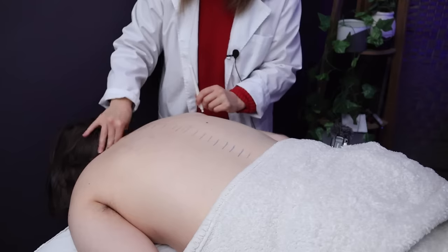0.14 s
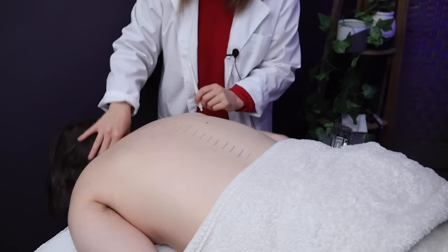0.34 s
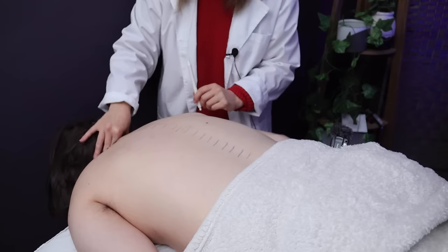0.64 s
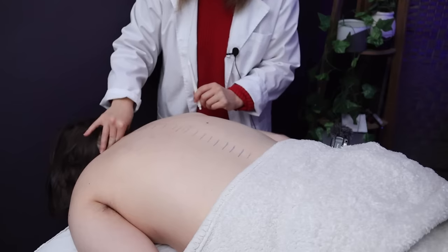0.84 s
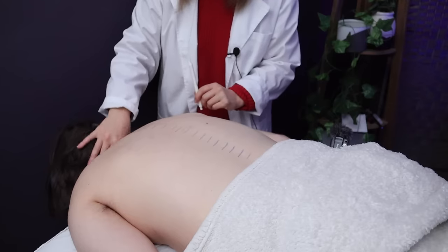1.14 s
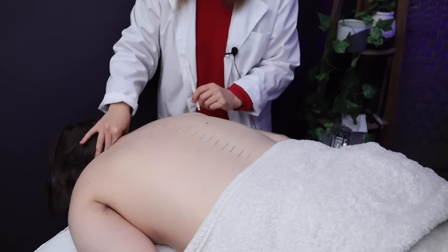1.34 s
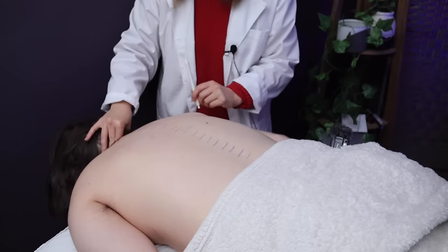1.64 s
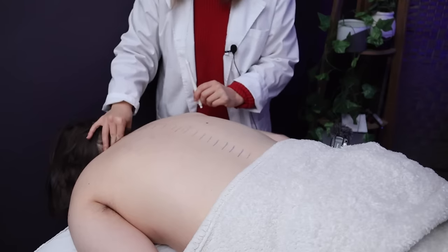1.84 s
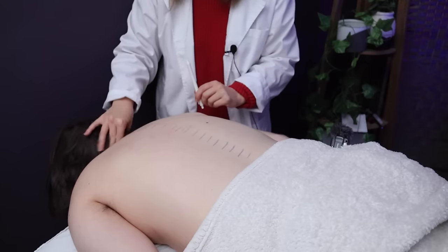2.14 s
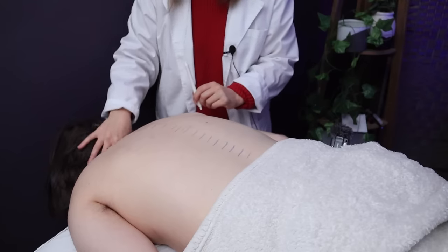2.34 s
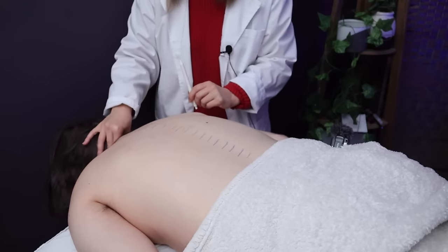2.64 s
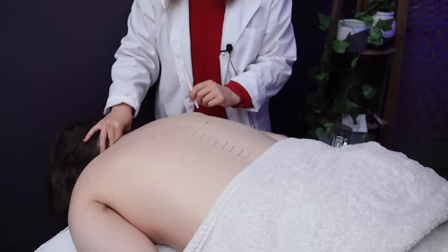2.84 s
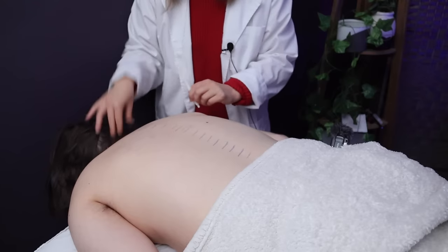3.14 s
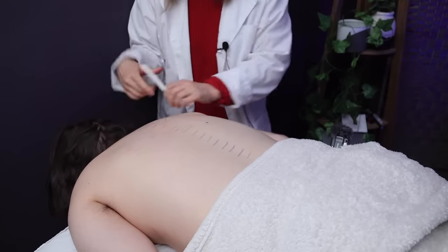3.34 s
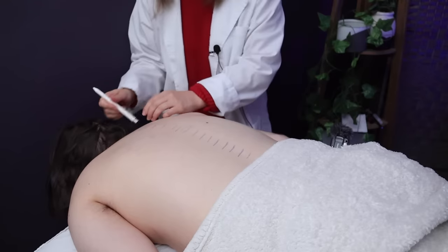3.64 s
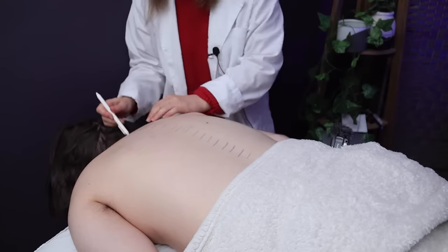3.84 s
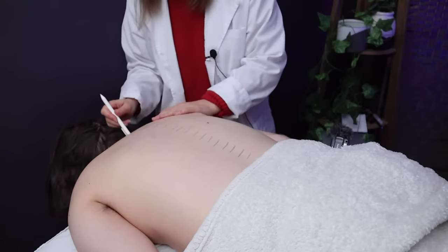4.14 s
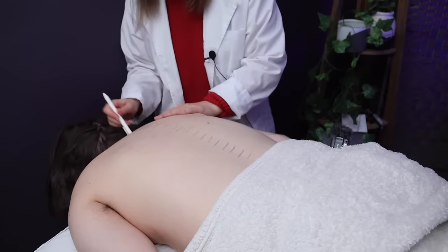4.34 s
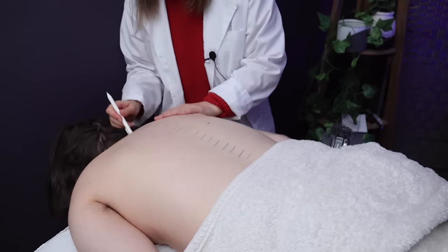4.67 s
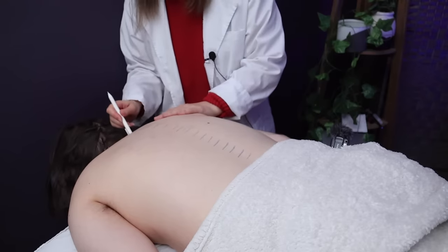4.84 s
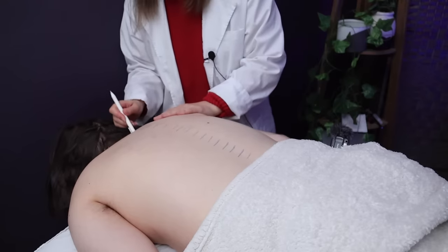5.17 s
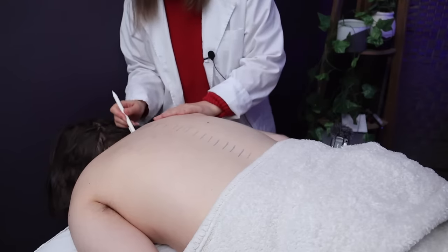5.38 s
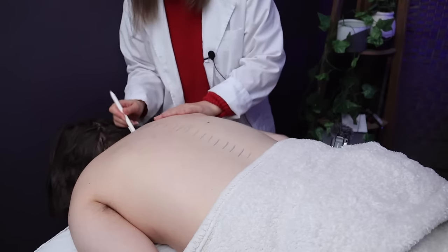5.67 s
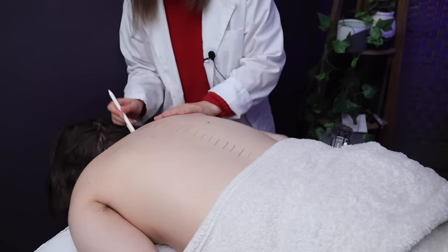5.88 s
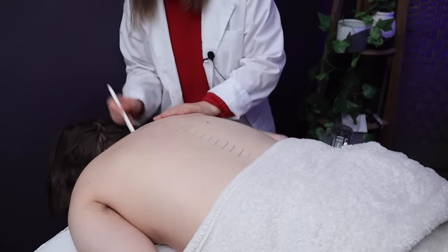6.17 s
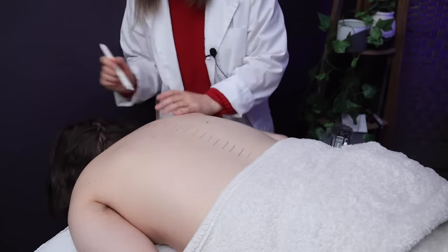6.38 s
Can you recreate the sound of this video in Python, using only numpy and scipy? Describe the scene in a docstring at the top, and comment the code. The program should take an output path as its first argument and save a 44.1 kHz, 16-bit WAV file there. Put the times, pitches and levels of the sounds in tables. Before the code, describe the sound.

A close lapel microphone in a quiet room with a faint low hush. From 0 to about 3.1 seconds, fingertips stroke through hair: short, soft, airy hisses, then a longer stroke from 1.4 to 2.3 with tiny crackling strand flicks near 2.1 and 3.0. A coat rustles low underneath; a dull soft bump falls at 0.64. From 3.1 to 3.8 the sleeve swishes more strongly, a thin slide at 3.36 draws the pen out, a low bump and cuff puff follow, and a tick sounds at 3.63. Another swish leads to a firmer tap at 4.16. From 4.31 to 6.38, twelve loud, bright, snappy presses each get a quieter, duller release about 0.07 seconds later, spaced unevenly at first, then roughly every 0.15 seconds. The last pair is almost merged. Faint handling ticks, short close reflections and a final light sleeve rustle around 6.5.

```python
"""In a quiet room, close to a lapel microphone, fingertips stroke through hair and a coat sleeve swishes.
The hand takes a plastic pen and clicks it against a person's neck: bright presses, duller releases.
Friction is noise of uneven grain, shaped by a spectrum and by the speed or pressure of the contact.
Impacts are short decaying noise bursts, coloured by the struck body; nearby surfaces echo the pen
within about 20 ms, and a faint diffuse tail follows."""
import sys
import numpy as np
from scipy import signal
from scipy.fft import rfft, irfft, next_fast_len
from scipy.io import wavfile
from scipy.ndimage import map_coordinates

SR = 44100
rng = np.random.default_rng(int(sys.argv[2]) if len(sys.argv) > 2 else 0)


def output_pcm(signal):
    """Save a mono or channel-first signal as 16-bit PCM at the path in sys.argv[1].

    Samples are clipped to [-1, 1] before scaling.
    """
    pcm = np.clip(np.atleast_2d(signal).T, -1, 1) * 32767
    wavfile.write(sys.argv[1], SR, np.round(pcm).astype(np.int16))


N = 287091  # length in samples

# All event levels of short sounds refer to the energy of this span.
REFERENCE_S = 0.005

# Spectrum of the room's hush: frequency_hz, relative_density_db [dB per Hz]
HUSH_SPECTRUM = [(12, -31), (20, 0), (91, -3), (193, -1.5), (301, -5.5), (499, -10), (574, -10), (642, -11),
                 (1370, -16), (2140, -18.5), (3740, -20.5), (4180, -22.5), (4940, -21.5), (16000, -27)]
# Reverberation time of the room: frequency_hz, t60_s
ROOM_T60 = [(200, 0.3), (2000, 0.47), (5000, 0.37), (10000, 0.36), (16000, 0.047)]
# Reflections from nearby surfaces: delay_s, level_db
ECHOES = [(.0070, -17.5), (.0093, -18), (0.012, -25.5), (0.0174, -34), (.0202, -27.5)]
# Colour of a snap as radiated into the room: frequency_hz, gain_db
RADIATED_COLOUR = [(200, -11.5), (600, -6.5), (1700, -13.5), (2600, -7), (4300, -1), (6000, -2.5),
                   (8000, -1.5), (9800, -2.5), (12500, -1.5), (14000, -10.5), (16000, -21)]

# Spectrum of the coat stirred by the arm: frequency_hz, relative_density_db [dB per Hz]
STIR_SPECTRUM = [(40, 1), (130, -1), (260, -1.5), (450, -10), (900, -8.5), (1600, -14), (4000, -23)]
# Spectrum of flapping cotton folds: frequency_hz, relative_density_db [dB per Hz]
FOLD_SPECTRUM = [(30, -33), (70, -2), (130, 1), (260, 0.5), (450, -2.5), (1000, -5), (2300, -9),
                 (4000, -17.5), (9000, -41)]
# Spectrum of the rasping weave: frequency_hz, relative_density_db [dB per Hz]
WEAVE_SPECTRUM = [(1000, -26), (2500, -1.5), (4000, -1.5), (5200, 0), (8200, -1), (10500, 1.5), (12000, -3),
                  (14000, -8.5), (16000, -23)]
# Moves of the arm: the fingers set off, a long stroke begins, the hand lifts off the head, fetches
# the pen, swings back, brings the pen to the neck, works the button and lifts away:
# fastest_s, speeding_up_s, slowing_down_s, flapping_db, sliding_db
ARM_MOVES = [(.12, 0.057, 0.034, -51.5, -73), (1.47, 0.098, 0.046, -58, -64),
             (3.264, .17, 0.18, -50.5, -45.5), (3.592, .4, 0.2, -41.5, -41), (3.779, 0.064, 0.49, -54, -59),
             (4.209, 0.48, 0.44, -48, -48.5), (5.8, 0.91, 0.56, -67.5, -79),
             (6.49, 0.31, 0.22, -54.5, -60.5)]
FLAP_POWER, SLIDE_POWER = 1.28, 1.57  # gain as a power of the arm's relative speed
FLOP_S = 3.61  # the loose cuff flops as the hands meet

# Spectrum of strands under the fingertips: frequency_hz, relative_density_db [dB per Hz]
STRAND_SPECTRUM = [(900, -37), (1600, -6), (2600, -7), (3300, 0), (4100, 1.5), (4900, -1.5), (6100, 0.5),
                   (8000, 0.5), (10700, -1.5), (12500, -6), (14000, -8), (16000, -27)]
# Strokes of the fingertips through the hair: start_s, length_s, level_db, flick_rate_per_s
HAIR_STROKES = [(0.046, 0.36, -53, 10), (0.434, .18, -50.5, 5), (0.712, .38, -53, 10),
                (1.088, 0.19, -54, 5), (1.356, 0.96, -58, 40), (2.315, 0.2, -54.5, 5),
                (2.422, 0.46, -64.5, 20), (2.85, 0.47, -59, 60)]
STROKE_ATTACK_S, STROKE_RELEASE_S = 0.069, 0.089  # the fingers speed up and lift
BEAR_DOWN_DB, BEAR_DOWN_S = 3.5, 0.25  # rise to full pressure and the time it takes
IN_HAIR_S = 3.12  # the hand leaves the hair at this time
# The loudest strands that flick free: start_s, level_db [over 5 ms]
LOUD_FLICKS = [(2.0806, -52), (2.148, -55), (2.186, -53.5), (2.2114, -49.5), (2.7645, -56), (2.947, -54),
               (3.022, -56), (3.0414, -53)]
# Colour of a flicking strand: frequency_hz, gain_db
FLICK_COLOUR = [(2000, -35), (6000, 2), (10000, 3), (13000, -2), (16000, -20)]
# Smooth slides: hair slips from under the fingers, then the barrel is drawn out of the other hand:
# fastest_s, speeding_up_s, slowing_down_s, level_db, centre_hz
SMOOTH_SLIDES = [(3.15, 0.56, 0.22, -66, 4100), (3.36, 0.1, 0.098, -47.5, 10000)]

# Soft bumps of the hand: start_s, level_db [peak before onset and decay], pitch_hz
HAND_BUMPS = [(.108, -46, 190), (0.644, -30.5, 119), (1.376, -41, 140), (3.457, -33, 80)]
# Ticks of the pen as it is gripped, set on the skin and shifted between clicks:
# start_s, level_db [over 5 ms], brightness_db_per_octave
PEN_TICKS = [(3.295, -54, -20), (3.6272, -33, -3.5), (4.164, -27.5, -1.5), (4.2067, -37.5, 6.5),
             (4.5441, -38, 1), (5.287, -41.5, -0.5), (5.3161, -47, 3), (5.527, -43, 1), (5.837, -50, 1),
             (6.3531, -46.5, -7)]
# Colour of a plastic snap: frequency_hz, gain_db
SNAP_COLOUR = [(300, -25.5), (1000, -13), (1700, -5), (2100, 1), (2700, 2), (3400, 1), (4600, 5.5),
               (6000, 3.5), (8500, 1.5), (9600, 6), (11000, 1), (12700, 0.5), (13800, -7), (16000, -10)]
# Colour of the pen's damped knock in the hand: frequency_hz, gain_db
KNOCK_COLOUR = [(60, -25.5), (140, -8), (260, -0.5), (560, 2.5), (900, -3), (1300, 0.5), (2200, -10.5),
                (4000, -40)]
SPRING_HZ, SPRING_WIDTH_HZ, SPRING_T60 = 4000, 450, 0.3  # faint after-ring; T60 in s
# Presses; the grip shifts the barrel's resonances and passes on more or less of the jolt:
# start_s, level_db [over 5 ms], brightness_db_per_octave, lower_hz, upper_hz, knock_db
PRESSES = [(4.3135, -18, 5, 3260, 8500, -45), (4.494, -17, 6.5, 2900, 11900, -35),
           (4.7836, -16, 5, 5770, 7700, -40.5), (4.9417, -19.5, 1.5, 2470, 10250, -39),
           (5.255, -20.5, 1, 6640, 11800, -47), (5.4764, -18.7, 4.5, 2900, 9300, -37),
           (5.6374, -19.5, 2.5, 2430, 11200, -50), (5.7907, -18, 3, 2850, 13100, -39),
           (5.9371, -18.5, 2, 6600, 8160, -42), (6.0792, -17.5, 4, 5170, 9700, -41.5),
           (6.2379, -18.5, 5, 5250, 7900, -44.5), (6.3689, -19, 0.5, 4020, 7200, -43)]
# Duller releases: start_s, level_db [over 5 ms], lower_hz, upper_hz
RELEASES = [(4.376, -31.5, 2720, 12400), (4.5557, -23, 4800, 9800), (4.8625, -29, 4080, 9800),
            (5.0231, -31, 6240, 10300), (5.346, -25, 4400, 10800), (5.545, -21.5, 3600, 6800),
            (5.7064, -30, 6300, 9100), (5.8612, -28.5, 2420, 10600), (6.0089, -25.5, 3740, 10400),
            (6.1506, -25.5, 4060, 7800), (6.2804, -25.5, 4960, 10000), (6.3776, -25.5, 2500, 10500)]
RELEASE_BRIGHT = -1.03  # dB per octave, the same for every release
# The button takes up its slack before each press: lead in s, level in dB, dB per octave
SLACK_S, SLACK_DB, SLACK_BRIGHT = 0.027, -59, -5.5
TOP_HZ = 16100  # band limit of the recorder


def amp(db):
    """Logarithmic level: decibels become an amplitude gain."""
    return 10 ** (np.asarray(db) / 20)


def unit(x):
    """Mean power: scale to rms 1."""
    return x / np.sqrt(np.mean(x ** 2) + 1e-20)


def burst(x):
    """Impulse energy: scale a short sound to the energy of 5 ms at rms 1."""
    return x * np.sqrt(REFERENCE_S * SR / (np.sum(x ** 2) + 1e-20))


def along(points, hz):
    """Spectral envelope: interpolate (Hz, value) points on a log-frequency axis."""
    point_hz, values = np.transpose(points)
    return np.interp(np.log(hz + 1), np.log(point_hz + 1), values)


def tilt(bright, hz):
    """Contact stiffness: harder contacts lift the treble, in dB per octave from 2 to 14 kHz."""
    return bright * np.log2(np.clip(hz, 2000, 14000))


def wobble(rate):
    """Slow fluctuation: a smooth random curve with rate knots a second."""
    knots = rng.standard_normal(int(N * rate / SR) + 4)
    return map_coordinates(knots, [np.arange(N) * rate / SR])


def filtered(x, response):
    """Linear filtering: multiply the spectrum of x by a response of frequency."""
    m = next_fast_len(N + SR // 2)
    return irfft(rfft(x, m) * response(np.fft.rfftfreq(m, 1 / SR)), m)[:N]


def coloured(x, gain_db, size=2048):
    """Causality: colour a short sound with a minimum-phase response, by folding its cepstrum."""
    log_gain = np.log(amp(gain_db(np.fft.rfftfreq(size, 1 / SR))))
    cepstrum = irfft(log_gain)
    cepstrum[1:size // 2] *= 2
    cepstrum[size // 2 + 1:] = 0
    return irfft(rfft(x, size) * np.exp(rfft(cepstrum)))


def add(track, s, sound):
    """Superposition: mix a sound into the track at time s."""
    part = track[max(0, round(s * SR)):][:len(sound)]
    part += sound[:len(part)]


def friction(spectrum, grain_db):
    """Granular noise: countless tiny slips of uneven size, with the given spectrum, at rms 1."""
    size_db = grain_db * np.minimum(rng.exponential(size=N), 7)
    slips = rng.standard_normal(N) * amp(size_db)
    return unit(filtered(slips, lambda hz: amp(along(spectrum, hz))))


def band(centre_hz, octaves):
    """Band-limited noise at rms 1, halved in amplitude at the given octaves from its centre."""
    def response(hz):
        return 1 / (1 + (np.log2((hz + 1) / centre_hz) / octaves) ** 4)
    return unit(filtered(rng.standard_normal(N), response))


def speed(s, rise, fall):
    """Uniform acceleration: a hand speeds up evenly until time s, then slows evenly to rest, 0-1."""
    return np.interp(np.arange(N) / SR, [s - rise, s, s + fall], [0, 1, 0])


def held(start, length):
    """Contact envelope: attack, hold and release of a finger's contact, 0-1."""
    t = np.arange(N) / SR - start
    return np.clip(np.minimum(t / STROKE_ATTACK_S, (length - t) / STROKE_RELEASE_S), 0, 1)


def in_hair():
    """Resting contact: 1 while the hand lies in the hair, 0 once it has lifted."""
    return held(-STROKE_ATTACK_S, IN_HAIR_S + STROKE_ATTACK_S)


def hush():
    """Stationary background noise: the room's steady hush, strongest in the bass."""
    return amp(-59.0) * friction(HUSH_SPECTRUM, grain_db=0.5)


def room(bright, tail_db=-23, scatter_db=-24, scatter_t60=0.14, gap=0.0044, echo_t60=0.011):
    """Reflection and decay: near echoes, scatter off the furniture and a faint tail answer a snap."""
    hz, frames, z = signal.stft(rng.standard_normal(SR // 3), SR, nperseg=256)
    decay = amp(-60 * frames / along(ROOM_T60, hz)[:, None])
    tail = signal.istft(z * decay, SR, nperseg=256)[1]
    t = np.arange(len(tail)) / SR

    def dying(t60):
        return burst(rng.standard_normal(len(t)) * amp(-60 * t / t60))

    answer = np.zeros(len(t))
    add(answer, gap, amp(tail_db) * burst(tail) + amp(scatter_db) * dying(scatter_t60))
    for delay, db in ECHOES:
        add(answer, delay, amp(db) * dying(echo_t60))
    # the pen radiates a different colour sideways than towards the microphone
    tinted = coloured(answer, lambda hz: along(RADIATED_COLOUR, hz) + tilt(bright, hz), size=16384)
    return tinted * np.linalg.norm(answer) / np.linalg.norm(tinted)


def arm(stir_db=-61, settle_db_per_s=-2.1):
    """Low cloth friction: the stroking arm stirs the coat in uneven rustles that slowly calm down."""
    uneven_db = 2.6 * wobble(25)
    level_db = stir_db + settle_db_per_s * np.arange(N) / SR + uneven_db
    return in_hair() * amp(level_db) * friction(STIR_SPECTRUM, grain_db=4)


def sleeve():
    """Speed-dependent friction: cotton folds flap low and the weave rasps high, catching together."""
    flapping, sliding = np.zeros(N), np.zeros(N)
    for s, rise, fall, flap_db, slide_db in ARM_MOVES:
        pace = speed(s, rise, fall)
        flapping = np.hypot(flapping, amp(flap_db) * pace ** FLAP_POWER)
        sliding = np.hypot(sliding, amp(slide_db) * pace ** SLIDE_POWER)
    catch = amp(0.98 * wobble(70))
    folds = flapping * friction(FOLD_SPECTRUM, grain_db=3.0)
    weave = sliding * friction(WEAVE_SPECTRUM, grain_db=2.0)
    return catch * (folds + weave)


def flop(flop_db=-44.5, rise=0.1, fall=0.074, centre_hz=130, octaves=0.77):
    """Displaced air: the loose cuff swings and pushes one low puff."""
    return amp(flop_db) * speed(FLOP_S, rise, fall) * band(centre_hz, octaves)


def flick(t60=0.0041, strike=3.8):
    """Released tension: one taut strand snaps off a fingernail in a sharp tick and a brief fizz."""
    t = np.arange(SR // 40) / SR
    fizz = rng.standard_normal(len(t)) * amp(-60 * t / t60)
    fizz[0] += strike
    return burst(coloured(fizz, lambda hz: along(FLICK_COLOUR, hz)))


def hair(hiss_db=-0.5, rest_db=-68, flick_db=-62, flick_spread_db=3):
    """Sliding and release: strands hiss under the fingertips and now and then one flicks free."""
    t = np.arange(N) / SR
    stroke, rate = amp(rest_db) * in_hair(), np.zeros(N)
    for s, length, db, flicks_per_s in HAIR_STROKES:
        contact = held(s, length)
        pressure_db = BEAR_DOWN_DB * np.clip((t - s) / BEAR_DOWN_S - 1, -1, 0)
        stroke = np.hypot(stroke, amp(db + pressure_db) * contact)
        rate += flicks_per_s * contact
    out = stroke * amp(hiss_db + 1.6 * wobble(39.52)) * friction(STRAND_SPECTRUM, grain_db=3.5)
    # a flick is no louder in a fast stroke than in a slow one
    flick_gain = amp(flick_db + flick_spread_db * rng.standard_normal(N))
    caught = (rng.random(N) < rate / SR) * flick_gain
    out += signal.fftconvolve(caught, flick())[:N]
    for s, db in LOUD_FLICKS:
        add(out, s, amp(db) * flick())
    return out


def slides(octaves=0.17):
    """Smooth sliding: each slide hisses thinly in its own narrow band, louder the faster it goes."""
    out = np.zeros(N)
    for s, rise, fall, db, centre_hz in SMOOTH_SLIDES:
        out += amp(db) * speed(s, rise, fall) * band(centre_hz, octaves)
    return out


def snap(bright, peaks_hz=(), crack_t60=0.0058, rise=0.00016, strike=1.38, grip_db=8.0,
         grip_width_hz=600):
    """Impact and resonance: a sharp strike and short crack excite the barrel's damped resonances."""
    t = np.arange(SR // 40) / SR
    crack = rng.standard_normal(len(t)) * amp(-60 * t / crack_t60) * (1 - np.exp(-t / rise))
    add(crack, rise, np.array([strike]))

    def barrel(hz):
        return sum(grip_db / (1 + ((hz - peak) / grip_width_hz) ** 2) for peak in peaks_hz)

    return burst(coloured(crack, lambda hz: along(SNAP_COLOUR, hz) + tilt(bright, hz) + barrel(hz)))


def knock(t60=0.012, scrape=0.085):
    """Damped impulse: the barrel jolts against finger and skin in one push with a little scrape."""
    t = np.arange(SR // 40) / SR
    push = scrape * rng.standard_normal(len(t)) * amp(-60 * t / t60)
    push[0] += 1
    return burst(coloured(push, lambda hz: along(KNOCK_COLOUR, hz)))


def touches(jolt_db=-13, bump_t60=0.017, bump_rise=0.00084):
    """Light impact and damped oscillation: ticks of the pen and dull bumps from the working hand."""
    out, t = np.zeros(N), np.arange(SR // 10) / SR
    for s, db, bright in PEN_TICKS:
        add(out, s, amp(db) * snap(bright, crack_t60=0.0043))
        add(out, s, amp(db + jolt_db) * knock())
        add(out, s, amp(db) * room(bright))
    for s, db, hz in HAND_BUMPS:
        envelope = amp(db - 60 * t / bump_t60) * (1 - np.exp(-t / bump_rise))
        add(out, s, envelope * np.sin(2 * np.pi * hz * t))
    return out


def spring():
    """Free vibration: the coil shivers on in a narrow, fuzzy band."""
    t = np.arange(SR // 5) / SR
    shiver = rng.standard_normal(len(t)) * amp(-60 * t / SPRING_T60)

    def resonance_db(hz):
        return -20 * np.log10(1 + ((hz - SPRING_HZ) / SPRING_WIDTH_HZ) ** 2)

    return burst(coloured(shiver, resonance_db, size=16384))


def click(db, bright, low_hz, high_hz, knock_db, spring_db=-53, room_db=0,
          rattle_db=-31, rattle_span=0.047, count=3):
    """Stored energy let go: the spring slams the cam, the pen jolts, loose parts settle, the room answers."""
    out = np.zeros(SR // 2)
    add(out, 0, amp(db) * snap(bright, (low_hz, high_hz)))
    add(out, 0, amp(knock_db) * knock())
    add(out, 0, amp(spring_db) * spring())
    add(out, 0, amp(db + room_db) * room(bright))
    for late in rattle_span * rng.random(count):
        part_db = db + rattle_db + 2 * rng.standard_normal()
        add(out, late, amp(part_db) * snap(bright, (low_hz,)))
    return out


def cam_slip(bright):
    """Stick-slip: the cam gives a little in a snap of softer onset."""
    return snap(bright, rise=0.0012, strike=1.0)


def pen(lead=0.00051, lead_db=-21, ride=0.003, ride_db=-33, release_knock_db=-39.5):
    """Cam and latch: a press takes up slack, rides up the cam and trips it; a release lets it drop back."""
    out = np.zeros(N)
    for s, db, bright, low_hz, high_hz, knock_db in PRESSES:
        add(out, s - SLACK_S, amp(SLACK_DB) * snap(SLACK_BRIGHT))
        add(out, s - ride, amp(db + ride_db) * cam_slip(bright))
        add(out, s - lead, amp(db + lead_db) * cam_slip(bright))
        add(out, s, click(db, bright, low_hz, high_hz, knock_db))
    for s, db, low_hz, high_hz in RELEASES:
        add(out, s - lead, amp(db + lead_db) * cam_slip(RELEASE_BRIGHT))
        add(out, s, click(db, RELEASE_BRIGHT, low_hz, high_hz, release_knock_db))
    return out


def scene():
    """Superposition: the room's hush, cloth, hair, hand and pen sum into one channel."""
    cloth = arm() + sleeve() + flop()
    hand = hair() + slides() + touches()
    return (hush() + cloth + hand + pen())[None]


def record(dry):
    """Saturation and band limit: the recorder rounds off the highest peaks and cuts the top treble."""
    top = 0.56  # the rounded peaks stay below this amplitude
    rounded = dry[0] / (1 + np.abs(dry[0] / top) ** 6) ** (1 / 6)
    return filtered(rounded, lambda hz: 1 / np.sqrt(1 + (hz / TOP_HZ) ** 160))[None]


dry = scene()
out = record(dry)
output_pcm(out)
```